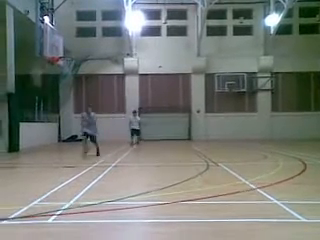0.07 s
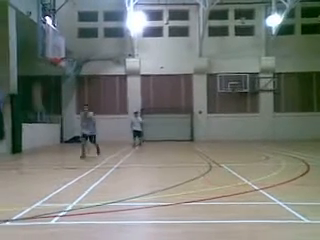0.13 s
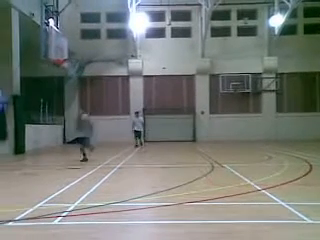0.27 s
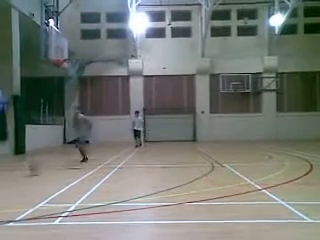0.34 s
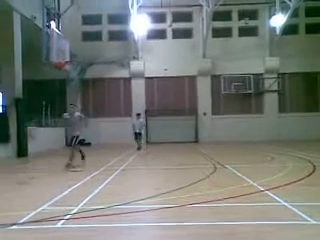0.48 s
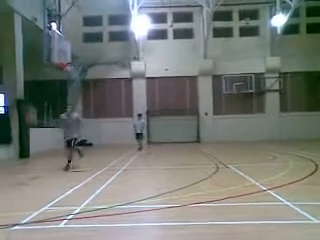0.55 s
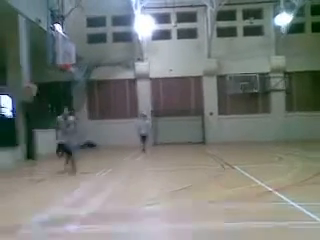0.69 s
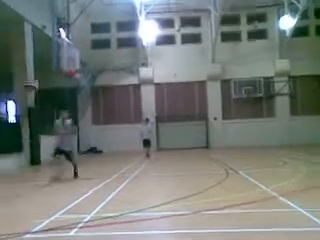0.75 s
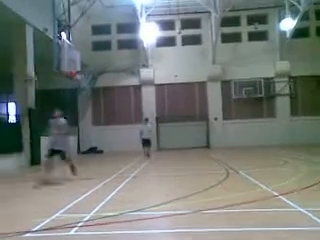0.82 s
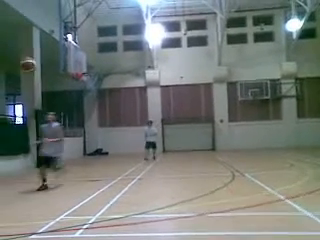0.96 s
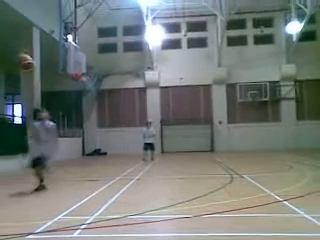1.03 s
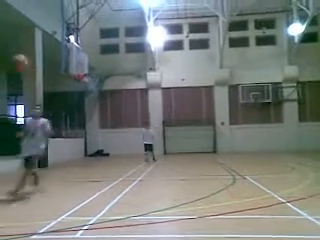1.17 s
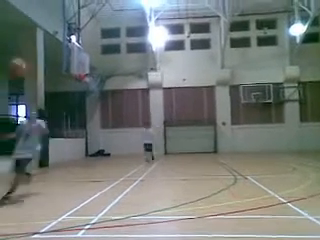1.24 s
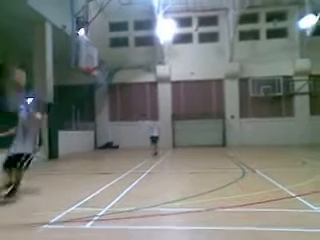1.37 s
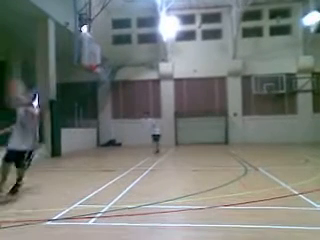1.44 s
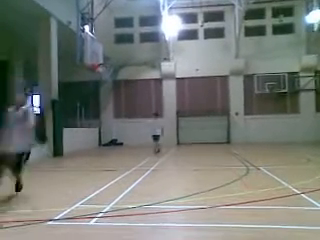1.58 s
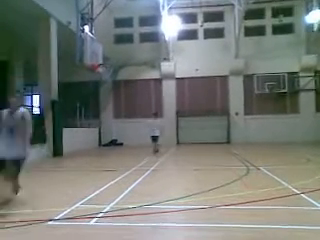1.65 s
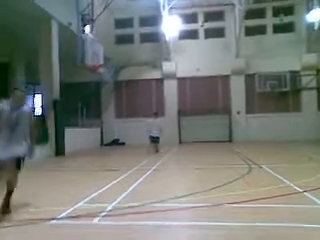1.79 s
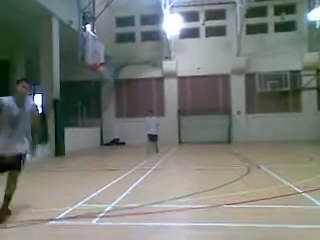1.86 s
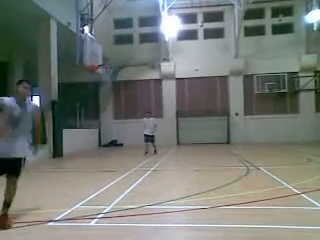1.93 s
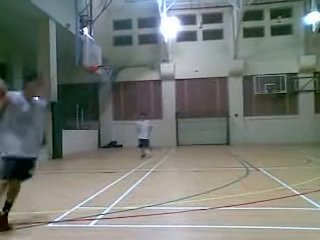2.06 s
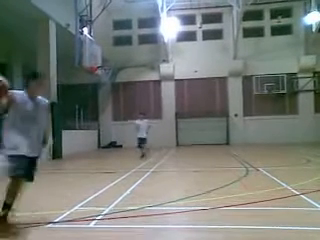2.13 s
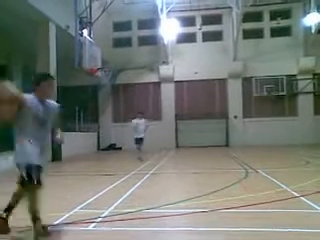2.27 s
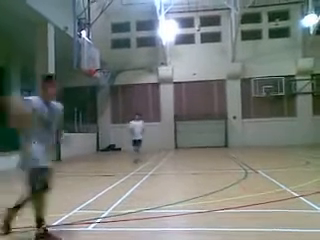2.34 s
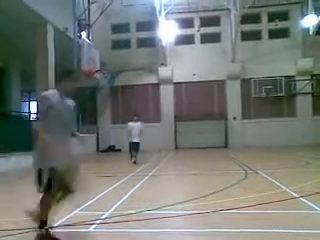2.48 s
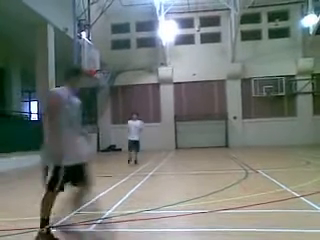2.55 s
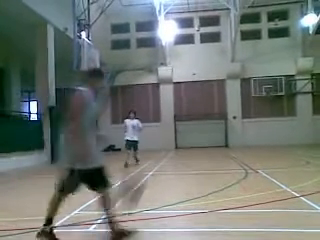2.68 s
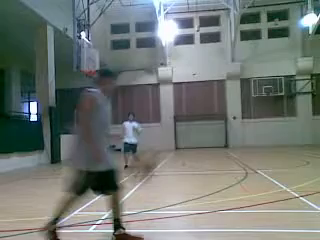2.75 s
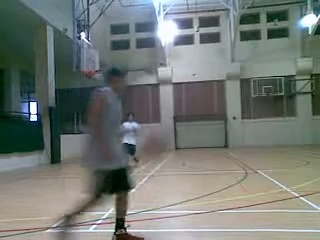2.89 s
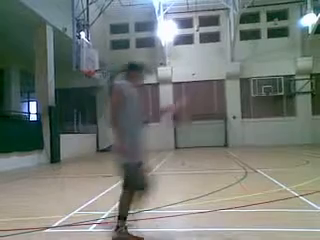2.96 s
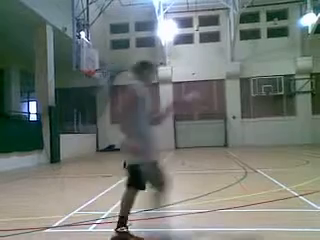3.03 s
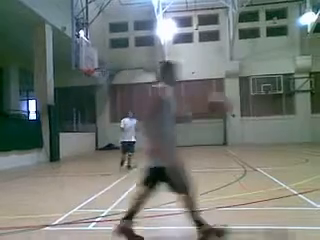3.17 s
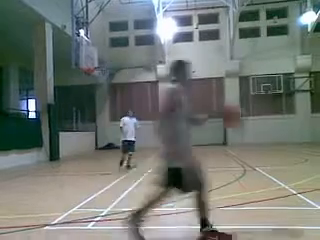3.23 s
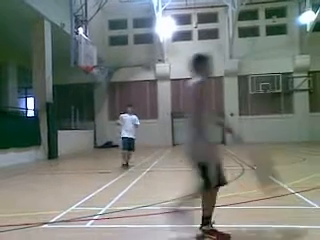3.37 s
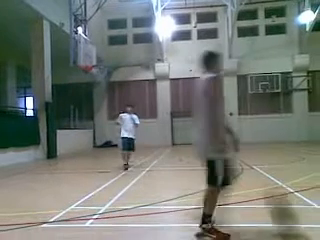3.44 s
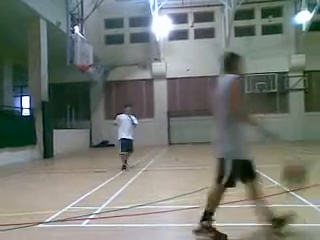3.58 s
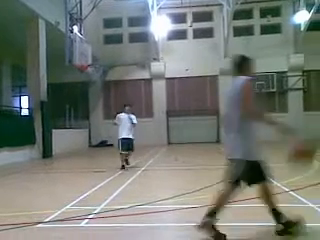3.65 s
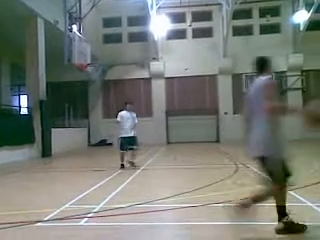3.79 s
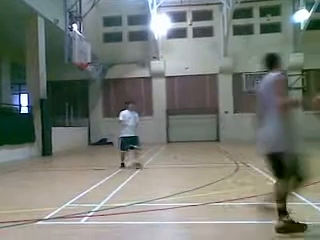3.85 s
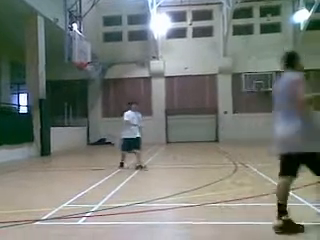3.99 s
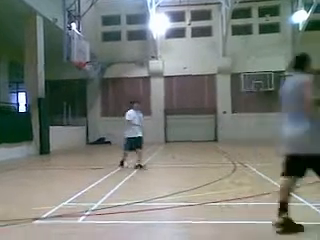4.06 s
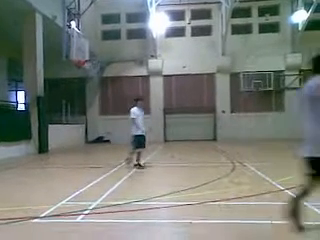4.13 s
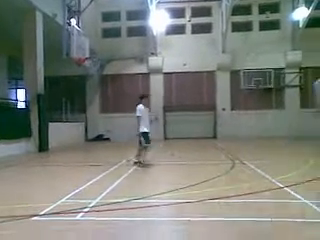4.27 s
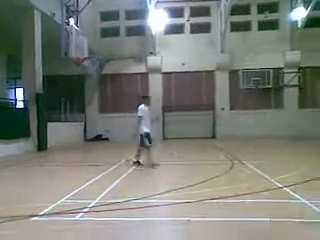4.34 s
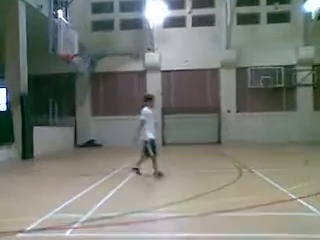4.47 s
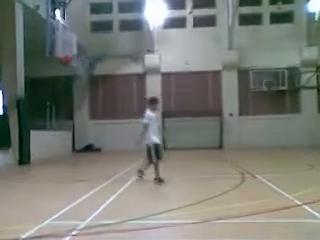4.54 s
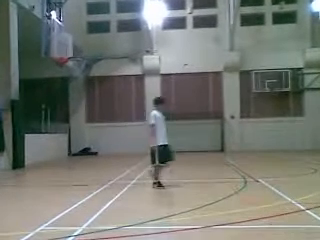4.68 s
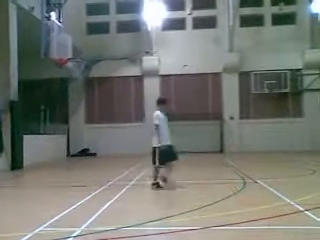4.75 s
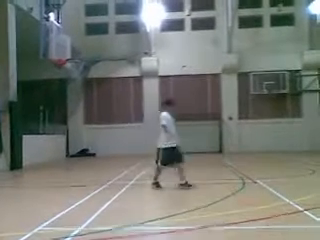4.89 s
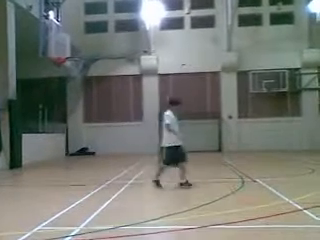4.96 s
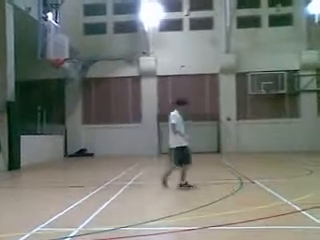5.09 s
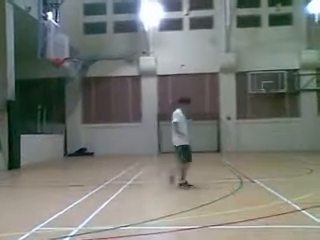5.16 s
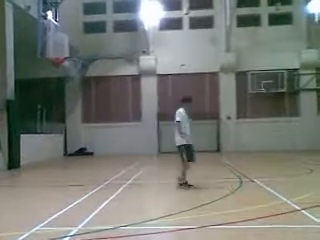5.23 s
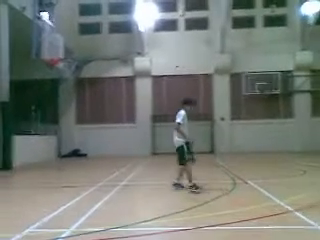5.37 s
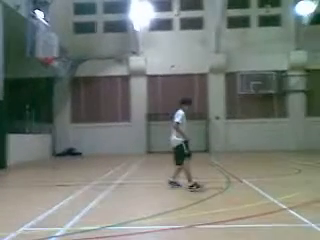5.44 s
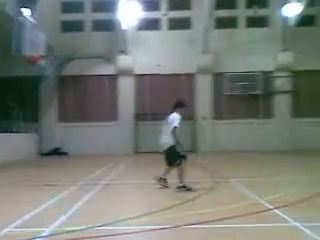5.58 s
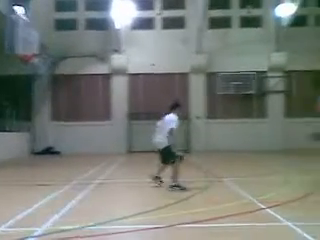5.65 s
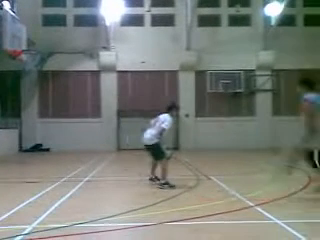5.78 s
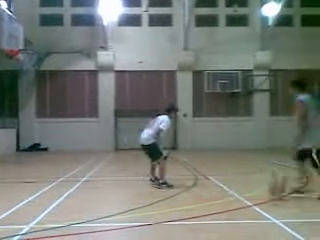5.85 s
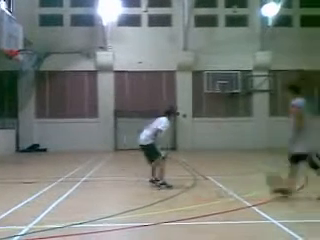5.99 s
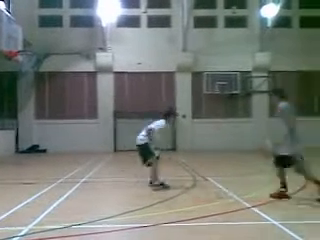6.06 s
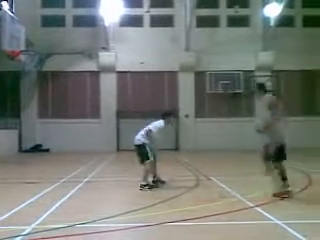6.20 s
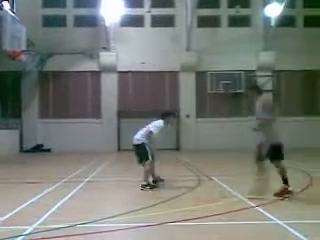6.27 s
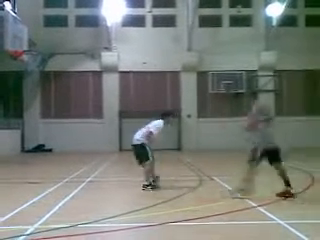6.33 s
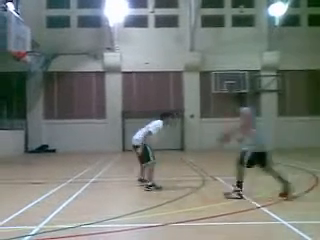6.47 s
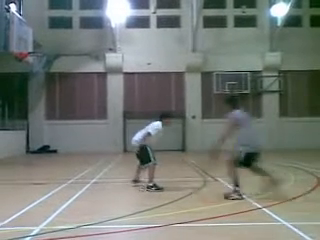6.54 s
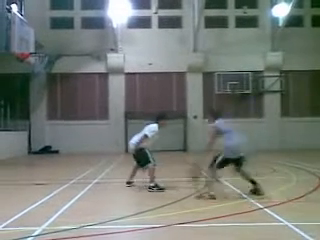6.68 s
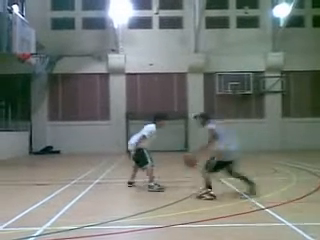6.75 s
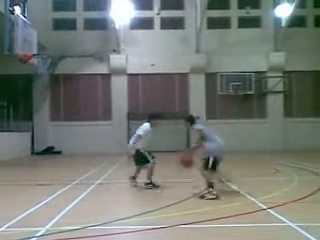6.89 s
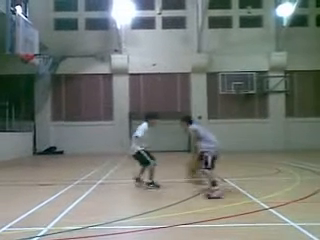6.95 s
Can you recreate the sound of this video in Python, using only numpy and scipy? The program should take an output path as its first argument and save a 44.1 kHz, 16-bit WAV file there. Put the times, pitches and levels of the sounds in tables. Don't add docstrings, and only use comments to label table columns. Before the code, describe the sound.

In a large reverberant gym, a basketball drops hard on sprung boards, is lightly touched and caught by hands, then dribbled slowly, about one bounce a second. Each hit is a rubbery slap with a brief hollow ring and low thump. Soft footfalls and scuffs fall between; shoes chirp briefly early and near the end. A small camera microphone gives dull, grainy sound over low ventilation rumble.

```python
import sys
import numpy as np
from scipy import signal
from scipy.fft import rfft, irfft
from scipy.io import wavfile
from scipy.ndimage import uniform_filter1d

SR = 44100
rng = np.random.default_rng(int(sys.argv[2]) if len(sys.argv) > 2 else 0)


def wrap_up_sound(samples):
    columns = np.atleast_2d(samples).T
    tamed = np.clip(columns, -1, 1)
    steps = np.round(tamed * 32767).astype(np.int16)
    wavfile.write(sys.argv[1], SR, steps)


def to_linear_factor(level_db):
    exponent = np.asarray(level_db, float) / 20
    return 10 ** exponent


N = 309582

# (time [s], slap level [dB], boards level [dB], boards t60 [s], hall level [dB])
BOUNCES = [
    (.458, -9, -3, 0.035, -18.5),
    (1.78, -12.5, -6.5, 0.031, -15.5),
    (2.705, -12.5, -9.5, 0.02, -22.5),
    (3.555, -12, -10, 0.029, -22.5),
    (4.471, -11, -8.5, 0.01, -24.5),
    (5.377, -15, -9, 0.043, -21),
    (5.954, -13.5, -9.5, 0.036, -18.5),
    (6.754, -13, -11, 0.1, -15),
]
# (time [s], slap level [dB], palm level [dB], thud level [dB], hall level [dB])
CATCHES = [
    (1.025, -22, -28, -50, -27),
    (1.351, -27.5, -23.5, -20.5, -15),
    (1.685, -13, -16.5, -12, -23.5),
]
# (frequency [Hz], t60 [s], level [dB])
BALL_AIR_MODES = [(882, 0.03, 5), (1760, 0.011, -2.5), (2690, 0.021, 1), (1227, 0.051, -10),
                  (572, 0.017, -4.5)]
# (frequency [Hz], level [dB per Hz])
SLAP_COLOUR = [(200, -13), (500, -6.5), (1000, -7), (1900, -4), (2750, -9.5), (3500, -17.5), (4300, -14),
               (5200, -8), (6000, -2), (7200, -14), (8500, -11.5), (10300, -24), (11000, -44), (22000, -92)]
# (frequency [Hz], level [dB per Hz])
BOUNCE_SPREAD = [(88, -26.5), (150, 2), (295, -14.5), (365, -3), (421, -10), (600, -4), (743, -5),
                 (1100, -11), (2670, -16.5), (3490, -29.5), (6270, -17.5), (9440, -31), (9950, -51),
                 (10500, -87.5), (13600, -120), (22000, -120)]
# (time [s],
# peak level [dB], frequency [Hz])
ECHOES_AND_KNOCKS = [(0.4706, -14.5, 5800), (.472, -18, 890), (0.491, -18, 1200), (1.366, -31, 700),
                     (1.366, -32, 6000), (1.687, -19, 270), (1.703, -21, 800), (1.796, -21.5, 1470),
                     (1.7993, -18, 5970), (1.81, -25.5, 6300), (2.721, -26.5, 1490), (2.731, -19, 2450),
                     (3.569, -19, 1204), (3.585, -20, 1800), (4.502, -23, 1520), (4.535, -29.5, 4970),
                     (5.405, -24, 1090), (5.981, -20, 5500), (5.982, -21.5, 1900), (5.988, -29.5, 5000)]
# (time [s], length [s], pitch of the lowest sounding partial [Hz], level [dB], second
# partial level [dB]); in the squeaks near 6.74 and 6.83 s this is the upper partial of a slip near 2.9 kHz,
# whose own tone stays silent
GRIPS = [(2.083, 0.0054, 2707, -15.5, -9), (2.088, .016, 3027, -24, 5), (2.102, .007, 2570, -21, -13.5),
         (2.103, 0.0087, 3130, -21.5, 5.5), (2.109, .018, 3064, -30.5, 7.5), (2.127, .012, 2939, -23, 2),
         (4.939, .014, 4127, -43, -22), (6.272, 0.0092, 2623, -24, -17), (6.277, .014, 2890, -33.5, 2),
         (6.293, 0.0092, 2690, -19.5, -15), (6.3019, 0.003, 2833, -14.5, -14),
         (6.304, 0.0087, 2976, -24.5, -7), (6.7399, 0.0057, 5927, -6.5, -51),
         (6.745, .014, 5606, -8.5, -40), (6.757, 0.0056, 2576, -19, -16), (6.814, .009, 3080, -41.5, 15.5),
         (6.83, 0.011, 5730, -15, -38), (6.835, 0.0094, 5890, -20, -31), (6.8415, .005, 6260, -11.5, -42),
         (6.8245, 0.0037, 6040, -16, -40)]
# (time [s], peak level [dB], frequency [Hz])
SNAP = (6.8175, -3, 7300)
# (time [s], level [dB], t60 [s])
LANDING = (6.843, -17, .03)
# (time [s], length
# [s], frequency [Hz], width [Hz], rms level [dB])
DRAGS = [(0.289, 0.11, 6070, 3390, -49), (0.379, 0.036, 2480, 1400, -46), (1.002, .012, 6520, 5200, -42.5),
         (1.658, 0.0082, 6400, 5100, -44.5), (1.661, 0.014, 2050, 1030, -42.5),
         (1.553, 0.12, 2690, 307, -52), (2.079, 0.049, 6210, 5500, -35), (3.182, 0.049, 5860, 3120, -51.5),
         (4.073, 0.04, 2060, 2570, -46), (4.964, 0.012, 3500, 500, -48), (5.045, 0.056, 6180, 3300, -49),
         (5.833, 0.1, 2050, 2250, -47.5), (6.281, 0.036, 6080, 1620, -37.5),
         (6.734, 0.008, 4570, 4770, -29.5), (6.816, .045, 5140, 2530, -31.5),
         (6.837, 0.017, 7860, 900, -29.5), (1.442, 0.12, 6600, 4000, -54), (6.86, 0.017, 5360, 3300, -29)]
# (time [s], peak level [dB], frequency [Hz], hall level [dB])
FOOTFALLS = [
    (.78, -27, 892, -35),
    (2.4883, -26.5, 433, -12.5),
    (3.213, -32, 880, -13),
    (3.617, -36, 890, -27.5),
    (4.264, -30.5, 372, -37),
    (4.59, -33.5, 1660, -8.5),
    (5.026, -25.5, 620, -10),
    (5.696, -32, 910, -24),
    (5.875, -35, 1200, -25),
]
# (frequency [Hz], t60 [s], level [dB])
HALL_DECAY = [(61, 1.03, -1.5), (116, 1.32, -0.5), (247, 0.71, 4), (527, 1.08, -7.5), (1000, 1.43, -2),
              (1950, 2, -2), (4000, 2, -3.5), (8840, 1.96, -8.5), (10340, 0.75, -8.5)]
# (frequency [Hz], level [dB per Hz])
AIR_COLOUR = [(15, -16), (40, 5.5), (110, 3.5), (250, -3), (450, -8), (850, -8.5), (1500, -12.5),
              (2700, -13.5), (3400, -23.5), (4200, -26.5), (5600, -23), (6500, -24.5), (7500, -28),
              (9000, -31.5), (10500, -37.5)]
# (frequency [Hz], rounding step [dB])
GRAIN_STEP = [(100, -20), (1500, -13), (3000, -6), (3400, 4), (5000, 5), (6500, 5), (8000, 4), (9200, 5),
              (10500, 5)]

SLAP_MS, RING_DB = 1.2, -6
SKIN_HZ, SKIN_DB, SKIN_HALL_DB = 670, -8, -21.5
BELLY_HZ, BELLY_DB = 270, -7
REBOUND_S, SQUASH_MS, BOARDS_HZ, BOARDS_HALL_DB = .0112, 10.5, 97.3, -20.5
PALM_HZ, THUD_HZ, THUD_MS, THUD_T60_S = 540, 117.4, 7.5, 0.0067
KNOCK_MS, KNOCK_SHORTENS, KNOCK_WIDTH = 3.6, .45, .9
GRIP_GLIDE, GRIP_EDGE_DB, THIRD_DB, GRIP_ROUGH, GRIP_HALL_DB = 0.037, -9, -9.5, 0.12, -15.5
SHADED_HZ, SHADED_WIDTH_HZ, SHADED_SHARE = 2800, 770, 0.32
ECHO_HALL_DB, SCUFF_HALL_DB = -34, -13.5
PLACES, HALL_GAP_S, HALL_RISE_S = 4, 0.0017, 0.0075
AIR_DB = -39
CEILING, TOP_HZ = 0.62, 10300
LONG, SHORT = 1880, 235
STEP_GROWTH, STEP_SCATTER_DB, SHORT_STEP_DB, SUDDEN_DB = .72, 4, 0.65, 8


def colour(x, points):
    hz, db = np.transpose(points)
    f = np.fft.rfftfreq(len(x), 1 / SR) + 1
    return irfft(rfft(x) * to_linear_factor(np.interp(np.log(f), np.log(hz), db)), len(x))


def band(x, hz, width):
    return signal.lfilter(*signal.iirpeak(min(hz, 9900), max(hz / width, .3), fs=SR), x)


def peak(x, db):
    return x * to_linear_factor(db) / np.abs(x).max()


def level(x, db):
    return x * to_linear_factor(db) / np.sqrt(np.mean(x ** 2))


def walk(n, rate):
    k = int(SR / rate) + 1
    held = np.repeat(rng.standard_normal(n // k + 1), k)
    return 1.3 * uniform_filter1d(held, k)[:n]


def add(out, s, x, hall_db, spread=None):
    i = int(s * SR)
    out[0, i:i + len(x)] += x[:N - i]
    far = x if spread is None else spread
    place = 1 + int(s * 2.3) % PLACES
    out[place, i:i + len(far)] += to_linear_factor(hall_db) * far[:N - i]


def slap(db):
    t = np.arange(2048) / SR
    burst = colour(rng.standard_normal(len(t)), SLAP_COLOUR)
    burst = burst * np.exp(-t * 1000 / SLAP_MS) * (1 - np.exp(-t / .0003))
    detune = 1 + .07 * rng.standard_normal(len(BALL_AIR_MODES))
    ring = sum(to_linear_factor(g) * np.sin(2 * np.pi * hz * d * t) * to_linear_factor(-60 * t / t60)
               for (hz, t60, g), d in zip(BALL_AIR_MODES, detune))
    return peak(peak(burst, 0) + peak(ring, RING_DB), db + 6.5)


def hide(db, hz):
    return knock(db, hz) + knock(db + BELLY_DB, BELLY_HZ)


def thump(db, hz, ms, t60):
    t = np.arange(-int(ms * SR / 1000), SR // 4) / SR
    press = np.clip(1 + t * 1000 / ms, 0, 1) ** .7
    swing = np.where(t < 0, press, to_linear_factor(-60 * t / t60))
    return to_linear_factor(db) * swing * np.cos(2 * np.pi * hz * t)


def knock(db, hz):
    t = np.arange(2048) / SR
    ms = KNOCK_MS * (1000 / hz) ** KNOCK_SHORTENS
    width = KNOCK_WIDTH * hz
    burst = rng.standard_normal(len(t)) * np.exp(-t * 1000 / ms) * (1 - np.exp(-t * 4000 / ms))
    return peak(band(band(burst, hz, width), hz, width), db)


def grip(length, hz, db, second_db):
    t = np.arange(0, length, 1 / SR)
    u = 2 * t / length - 1
    shake = [GRIP_ROUGH * walk(4096, 600)[:len(t)] for _ in range(4)]
    rate = hz * (1 + GRIP_GLIDE * u) * (1 + .16 * shake[0])
    phase = 2 * np.pi * np.cumsum(rate) / SR
    partials = sum(to_linear_factor(g + 6.2 * shake[k]) * np.sin(k * phase)
                   for k, g in ((1, 0), (2, second_db), (3, second_db + THIRD_DB)))
    return to_linear_factor(db + GRIP_EDGE_DB * np.abs(u)) * partials * signal.windows.tukey(len(t), .12)


def scuff(length, hz, width, db):
    noise = rng.standard_normal(int(length * SR))
    hiss = band(band(noise, hz, width), hz, width)
    return level(hiss * np.hanning(len(noise)) ** 2.1, db)


def hall():
    t = np.arange(2 * SR) / SR
    f = np.fft.rfftfreq(len(t), 1 / SR) + 1
    noise = rfft(rng.standard_normal(len(t)))
    centres = np.log([row[0] for row in HALL_DECAY])
    tail = 0
    for (_, t60, g), share in zip(HALL_DECAY, np.eye(len(HALL_DECAY))):
        octave = irfft(noise * np.interp(np.log(f), centres, share), len(t))
        tail = tail + to_linear_factor(g - 60 * t / t60) * octave
    tail = tail * to_linear_factor(3.6 * np.exp(-t / 0.099) * walk(len(t), 300))
    return 0.12 * tail * np.clip((t - HALL_GAP_S) / HALL_RISE_S, 0, 1)


def air():
    steady = colour(rng.standard_normal(N), AIR_COLOUR)
    rumble = signal.sosfilt(signal.butter(2, 250, fs=SR, output="sos"), steady)
    hiss = steady - rumble
    return level(rumble * to_linear_factor(1.2 * walk(N, 5)) + hiss * to_linear_factor(.6 * walk(N, 8)), AIR_DB)


def scene():
    out = np.zeros((1 + PLACES, N))
    spread = peak(colour(signal.unit_impulse(1024, 256), BOUNCE_SPREAD), 0)
    for s, db, boards_db, t60, hall_db in BOUNCES:
        add(out, s + .001, slap(db), hall_db + db + 16.5, spread)
        add(out, s + .002, hide(db + SKIN_DB, SKIN_HZ), SKIN_HALL_DB)
        boards = thump(boards_db, BOARDS_HZ, SQUASH_MS, t60)
        add(out, s + REBOUND_S - SQUASH_MS / 1000, boards, BOARDS_HALL_DB)
    for s, db, palm_db, thud_db, hall_db in CATCHES:
        add(out, s + .001, slap(db), hall_db + db + 16.5, spread)
        add(out, s + .002, hide(palm_db, PALM_HZ), SKIN_HALL_DB)
        add(out, s, thump(thud_db, THUD_HZ, THUD_MS, THUD_T60_S), BOARDS_HALL_DB)
    s, db, t60 = LANDING
    add(out, s - SQUASH_MS / 1000, thump(db, BOARDS_HZ, SQUASH_MS, t60), BOARDS_HALL_DB)
    for s, db, hz in [*ECHOES_AND_KNOCKS, SNAP]:
        add(out, s, knock(db, hz), ECHO_HALL_DB)
    for s, db, hz, hall_db in FOOTFALLS:
        add(out, s, knock(db, hz), hall_db)
    for s, *drag in DRAGS:
        add(out, s, scuff(*drag), SCUFF_HALL_DB)
    for s, *sole in GRIPS:
        squeak = grip(*sole)
        shaded = squeak - SHADED_SHARE * band(squeak, SHADED_HZ, SHADED_WIDTH_HZ)
        add(out, s, squeak, GRIP_HALL_DB, shaded)
    wet = sum(signal.fftconvolve(place, hall())[:N] for place in out[1:])
    return (out[0] + wet + air())[None]


def grain(x, hop, db):
    frames = np.pad(x, (hop // 2 + hop, 3 * hop))[:(N // hop + 4) * hop].reshape(-1, hop)
    n = np.arange(2 * hop)
    k = np.arange(hop // 2) + .5
    window = signal.windows.kaiser_bessel_derived(2 * hop, 4 * np.pi)
    basis = window * np.cos(np.pi / hop * np.outer(k, n + .5 + hop / 2)) * np.sqrt(2 / hop)
    bins = np.hstack([frames[:-1], frames[1:]]) @ basis.T
    hz = k * SR / (2 * hop)
    treble = np.sqrt(np.mean(bins[:, hz > 1500] ** 2, axis=1, keepdims=True)) + 1e-9
    scatter = np.repeat(rng.standard_normal((len(bins), hop // 32 + 1)), 16, axis=1)[:, :len(k)]
    step_db = db + STEP_SCATTER_DB * scatter + np.interp(hz, *np.transpose(GRAIN_STEP))
    step = to_linear_factor(step_db) * .01 * (treble / .01) ** STEP_GROWTH
    rounded = np.sign(bins) * step * np.floor((np.abs(bins) / step) ** .75 + .4) ** (4 / 3)
    back = rounded @ basis
    joined = back[1:, :hop] + back[:-1, hop:]
    return joined.ravel()[hop // 2:hop // 2 + N]


def low_pass(x):
    return signal.sosfilt(signal.butter(12, 11210, fs=SR, output="sos"), x)


def record(dry):
    rounded = CEILING * np.tanh(dry[0] / CEILING)
    x = signal.sosfilt(signal.ellip(8, .2, 70, TOP_HZ, fs=SR, output="sos"), rounded)
    power = uniform_filter1d(np.diff(x, prepend=0) ** 2, SHORT) + 1e-12
    before = np.roll(uniform_filter1d(power, LONG), LONG // 2 + SHORT)
    jump = power > to_linear_factor(2 * SUDDEN_DB) * before
    sudden_frames = np.pad(jump, (0, -N % LONG)).reshape(-1, LONG).any(axis=1)
    sudden = np.repeat(sudden_frames, LONG)[:N]
    share = uniform_filter1d(1. * sudden, SHORT)
    mix = grain(share * x, SHORT, SHORT_STEP_DB) + grain((1 - share) * x, LONG, 0)
    return low_pass(mix[None])


dry = scene()
out = record(dry)
wrap_up_sound(out)
```